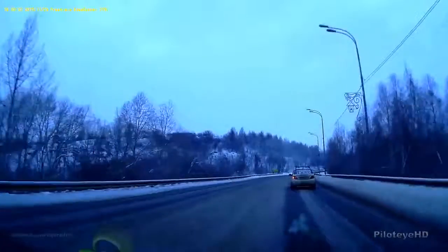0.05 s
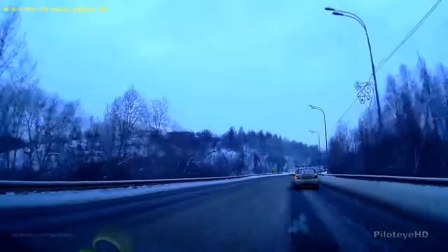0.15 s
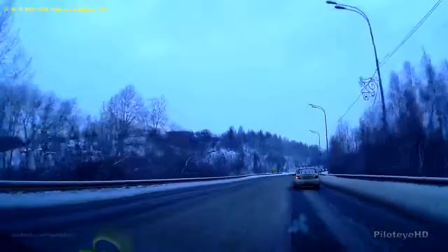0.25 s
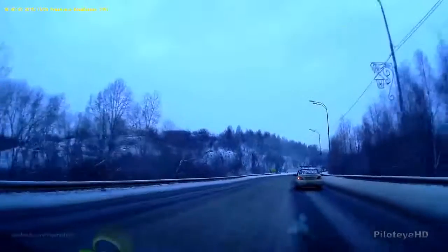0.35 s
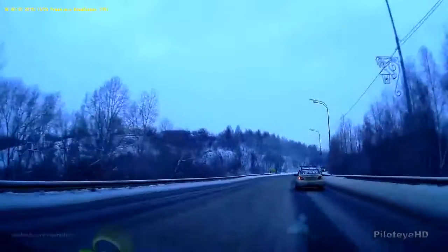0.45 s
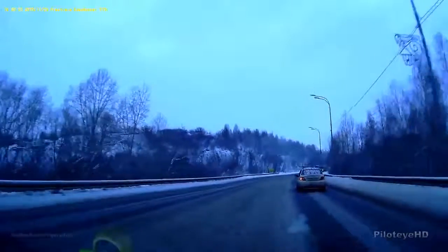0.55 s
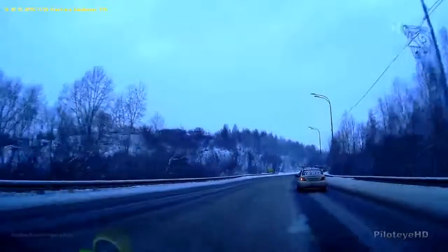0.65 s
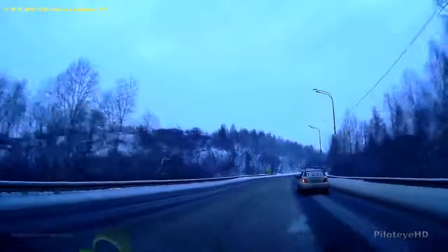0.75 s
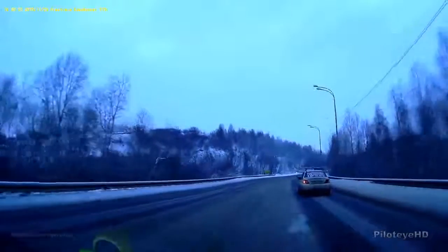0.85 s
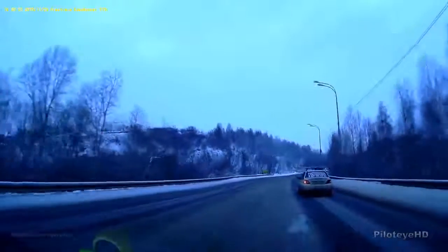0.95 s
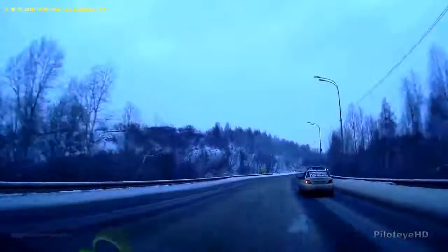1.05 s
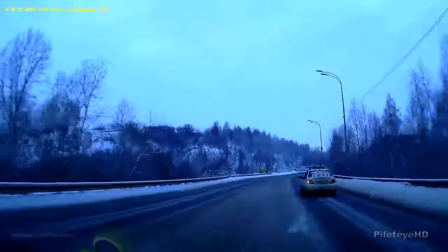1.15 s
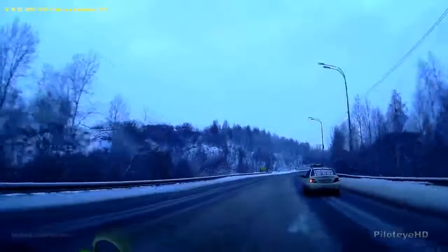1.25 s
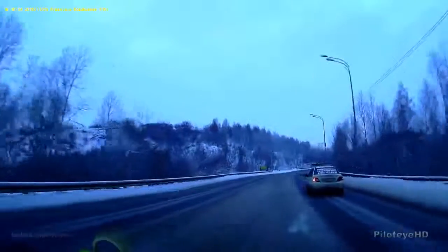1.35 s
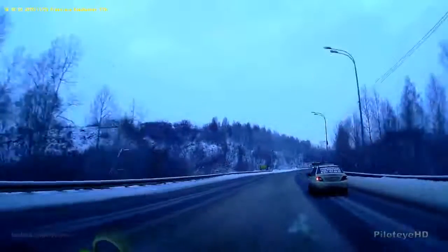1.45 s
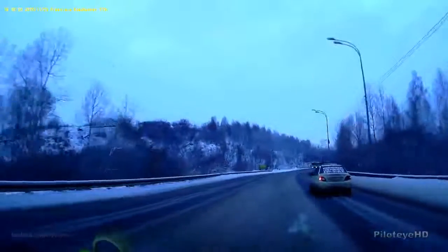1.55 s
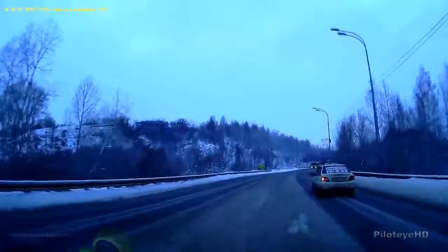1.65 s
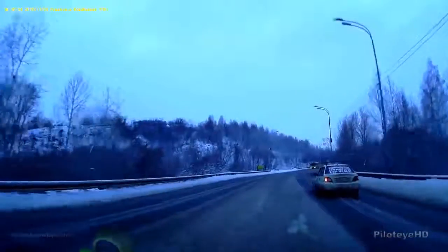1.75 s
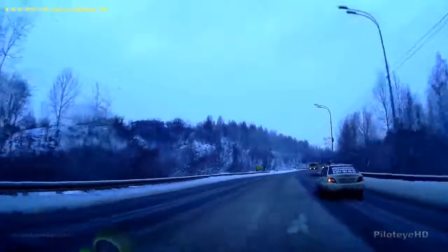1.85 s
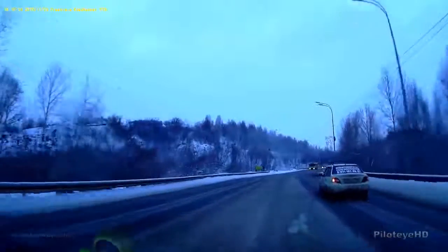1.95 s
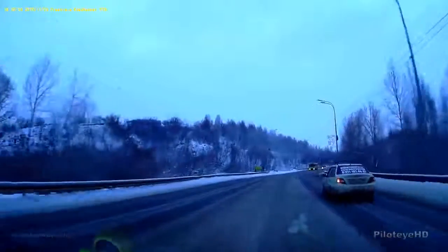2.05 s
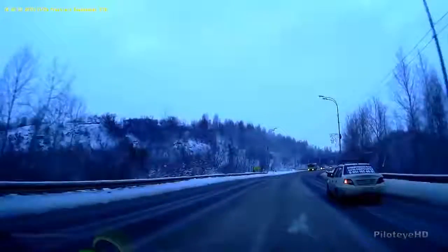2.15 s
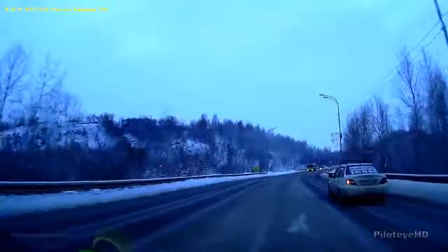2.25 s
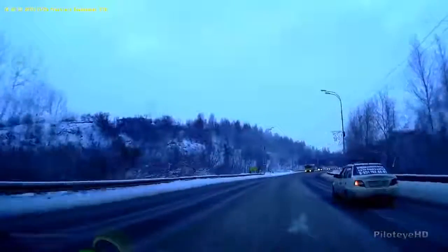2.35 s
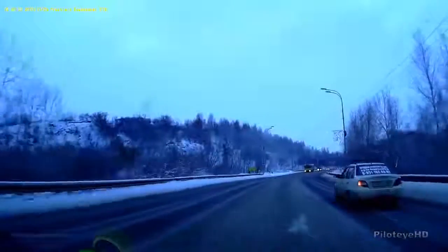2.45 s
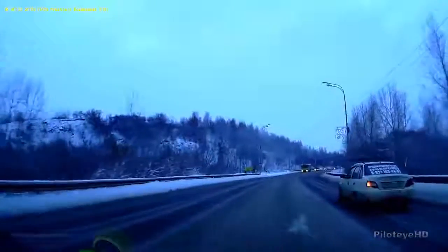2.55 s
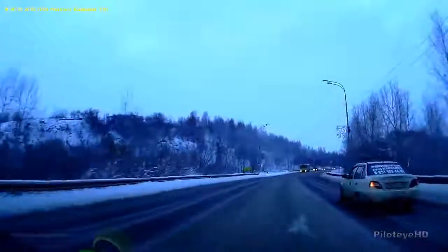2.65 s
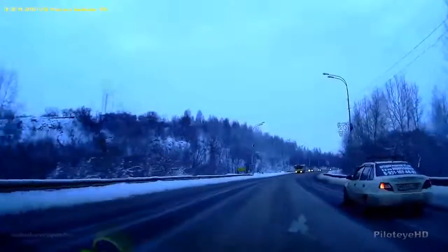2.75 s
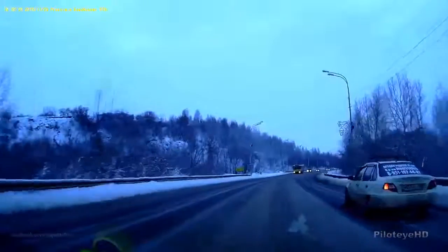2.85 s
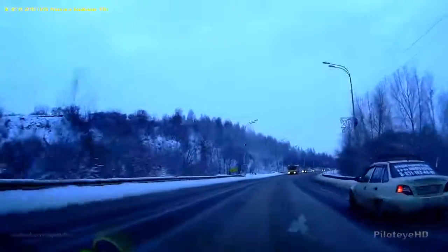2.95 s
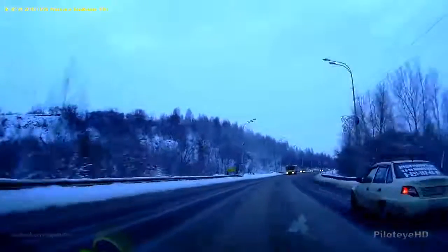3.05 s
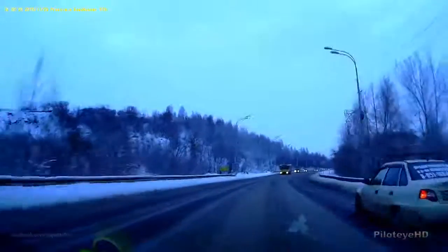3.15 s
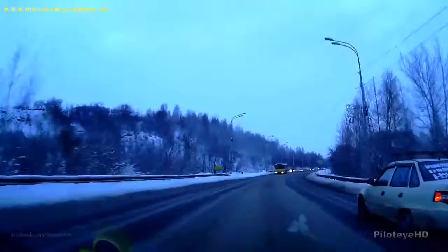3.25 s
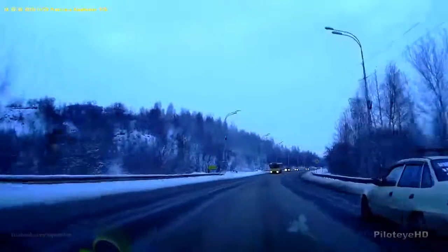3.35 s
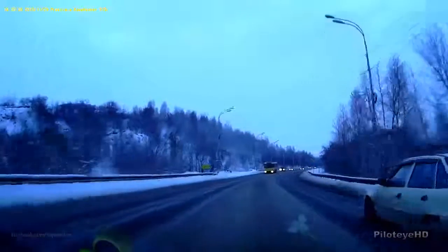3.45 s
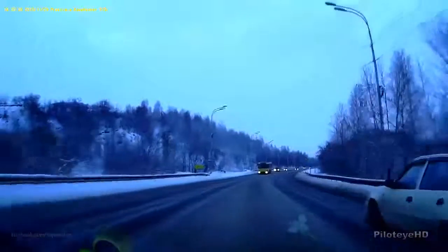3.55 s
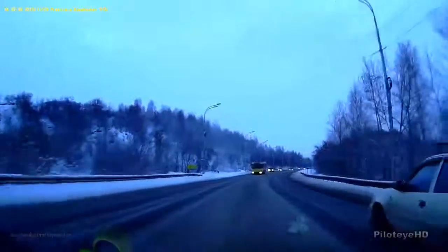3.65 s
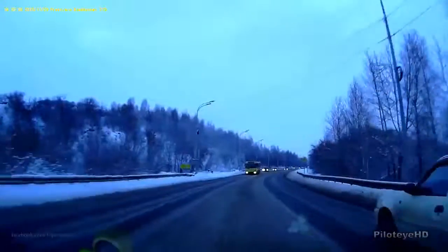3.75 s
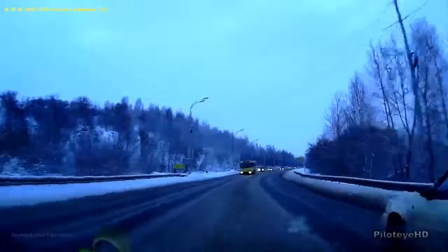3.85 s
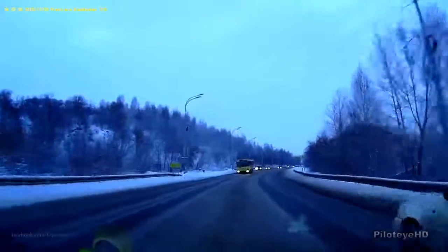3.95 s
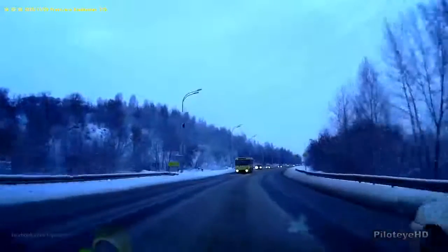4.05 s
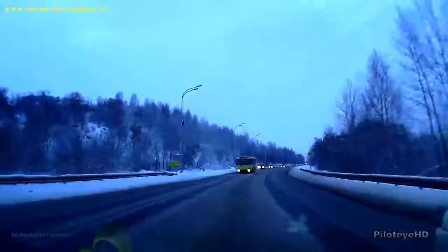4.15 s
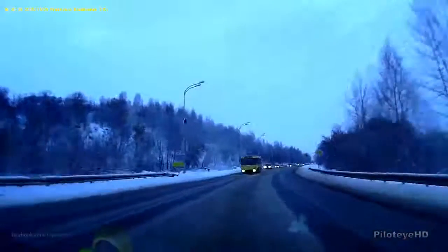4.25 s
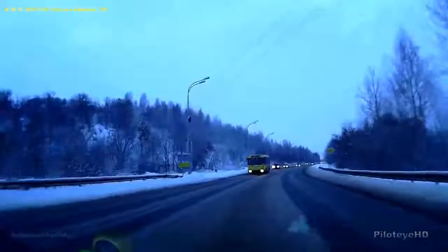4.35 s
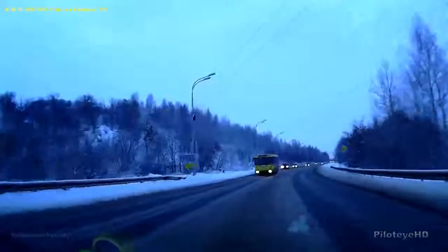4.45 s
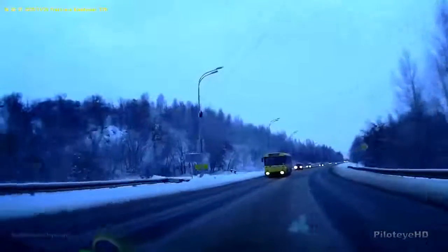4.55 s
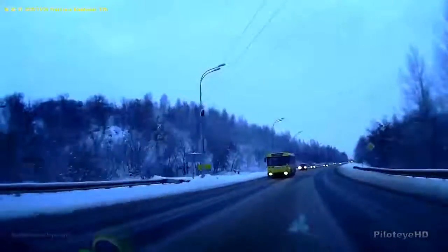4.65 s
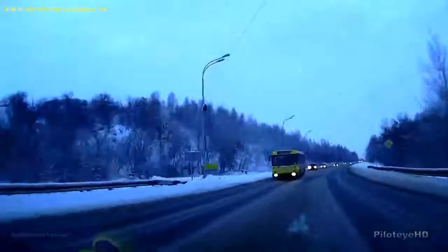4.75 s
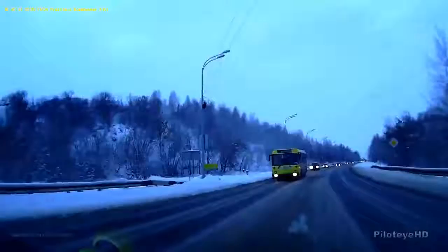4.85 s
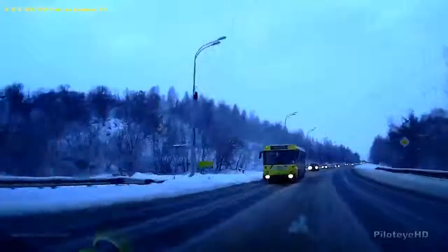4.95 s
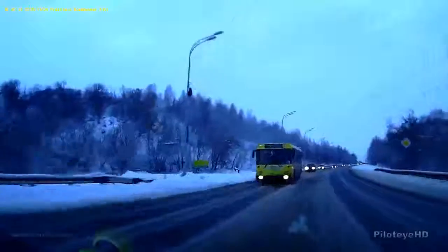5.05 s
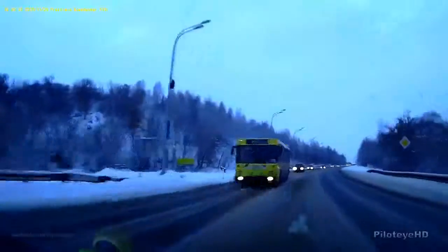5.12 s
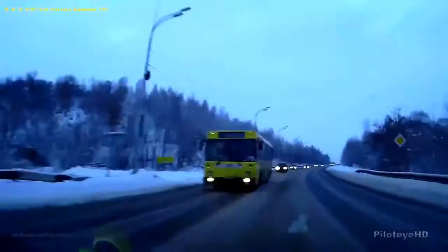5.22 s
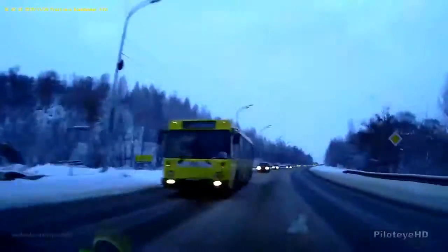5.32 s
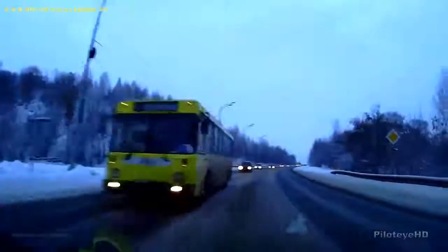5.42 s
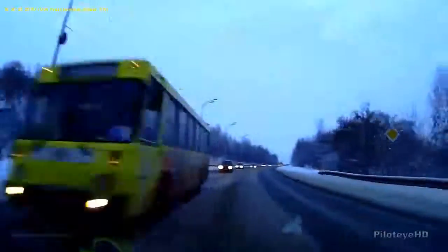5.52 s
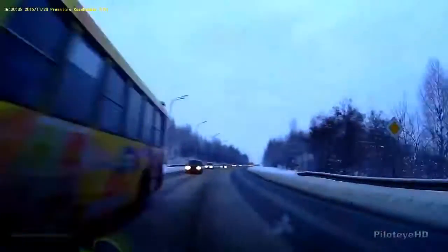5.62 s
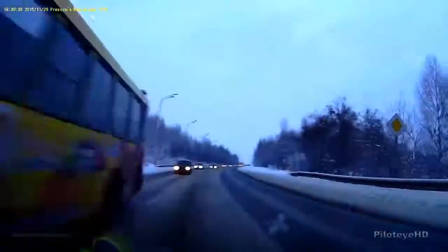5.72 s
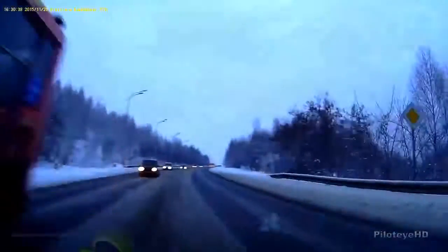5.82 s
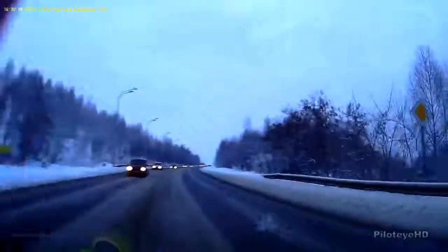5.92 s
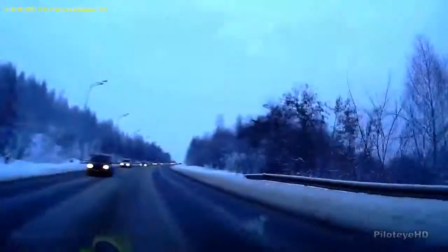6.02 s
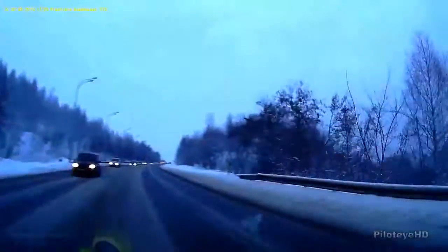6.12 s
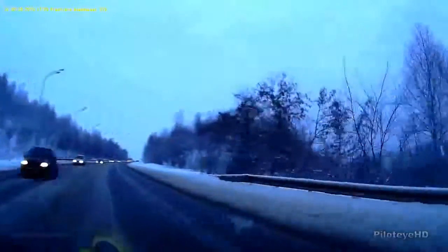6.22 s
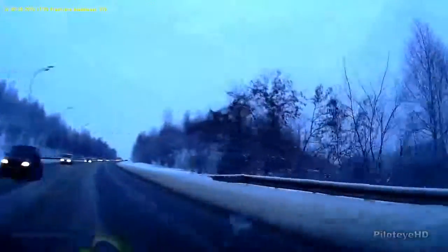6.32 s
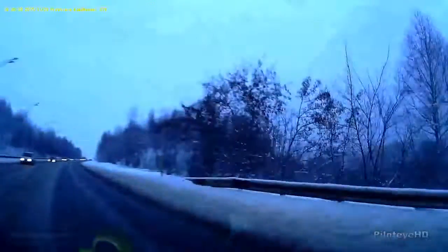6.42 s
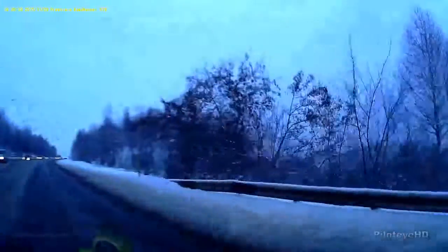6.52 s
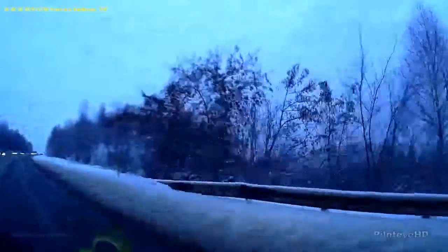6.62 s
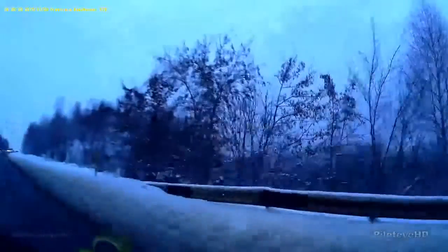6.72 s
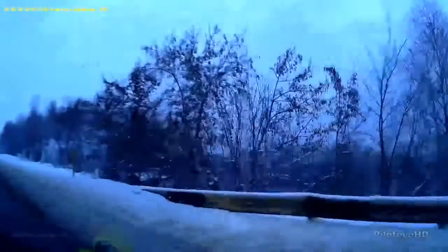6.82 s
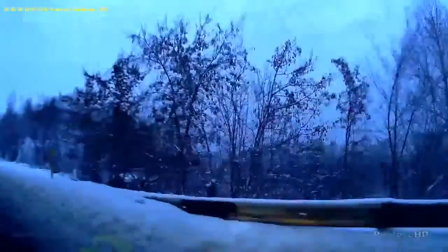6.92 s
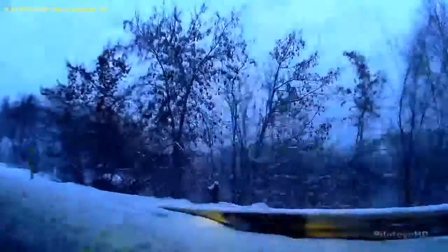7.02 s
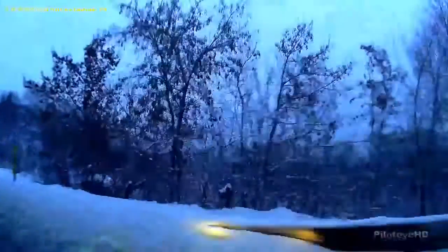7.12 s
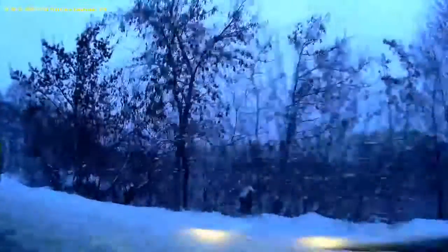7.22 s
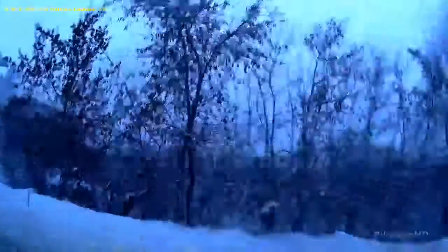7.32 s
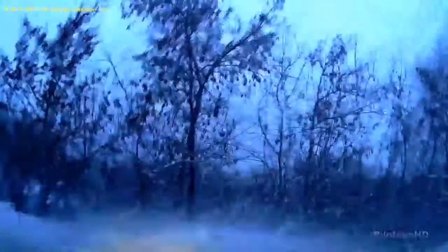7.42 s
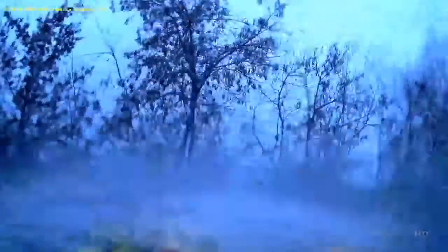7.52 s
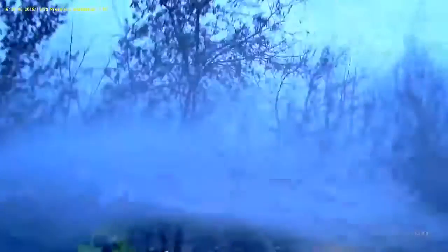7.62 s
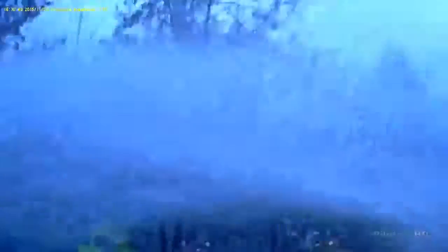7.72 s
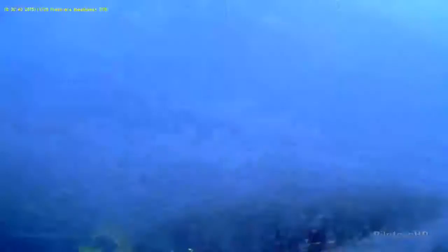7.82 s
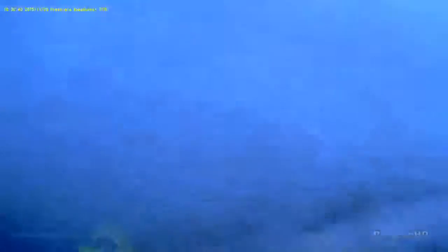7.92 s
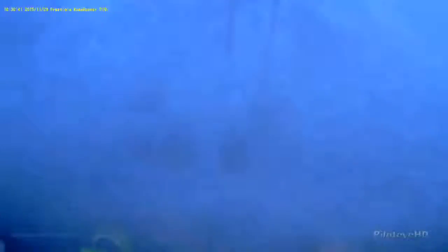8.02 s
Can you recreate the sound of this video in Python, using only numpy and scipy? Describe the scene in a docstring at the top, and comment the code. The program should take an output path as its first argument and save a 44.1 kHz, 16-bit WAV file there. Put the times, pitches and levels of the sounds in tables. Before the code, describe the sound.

A windscreen camera microphone picks up muffled engine drone, wheel rumble and faint electronic hiss in a small car. The engine revs briefly, then eases off. After four seconds, slush and thin spray build with loose plastic clatter. A deep falling boom begins the final crash, followed by rapid body blows, metallic panel ringing and dense lumps of snow, harshly distorted and loud to the end.

```python
"""The engine of a small car on a winter road, close up in the cabin, heard by a camera microphone on the windscreen.
Engine tones swell through cabin resonances as it revs and is let off, over filtered-noise boom and tyre roar.
Slush and spray, made of tiny random impacts, grow as the car skids; loose parts knock and ring around the cabin.
Then it ploughs into a snowbank and guard rail: thuds, ringing panels and flying snow.
This overloads the microphone, which rounds, sags and clips; noise bursts add its bright crackle."""
import sys
import numpy as np
from scipy import signal
from scipy.fft import rfft, irfft
from scipy.io import wavfile
from scipy.ndimage import uniform_filter1d

SR = 44100
rng = np.random.default_rng(int(sys.argv[2]) if len(sys.argv) > 2 else 0)


def wav_record(signal):
    """Record a signal, one row per channel, as 16-bit PCM in the file named by sys.argv[1]."""
    frames = np.transpose(np.atleast_2d(signal))
    bounded = np.clip(frames, -1, 1)
    # unit amplitude maps onto the largest positive 16-bit level
    quanta = np.round(bounded * 32767).astype(np.int16)
    wavfile.write(sys.argv[1], SR, quanta)


N = 356328
TIME = np.arange(N) / SR
FREQ = np.maximum(np.arange(N // 2 + 1) * SR / N, 1)
SKID_S, BANK_S = 4.32, 7.25  # the car leaves the ruts, then meets the bank [s]


def undb(db):
    """Decibels to gain."""
    return 10 ** (np.asarray(db) / 20)


def unit(x):
    """Scale to rms 1."""
    return x / np.sqrt(np.mean(x ** 2))


def curves(table):
    """The columns of a timed table at every sample."""
    s, *columns = np.transpose(table)
    return [np.interp(TIME, s, c) for c in columns]


def noise():
    """White noise."""
    return rng.standard_normal(N)


def walk(rate):
    """Smooth random wander of rms 1, with a new target `rate` times a second."""
    k = max(int(SR / rate), 1)
    steps = np.repeat(rng.standard_normal(N // k + 1), k)[:N]
    return unit(uniform_filter1d(steps, k))


def grains(rate, spread_db):
    """Random tiny impacts of uneven size, `rate` per second on average, rms 1."""
    size = undb(spread_db * np.minimum(rng.exponential(size=N), 4))
    return unit((rng.random(N) < rate / SR) * size * np.sign(noise()))


def colour(x, points):
    """Causal filter through (Hz, dB) points, falling away above the last; white noise keeps its level."""
    hz, db = np.transpose(points)
    gain = undb(np.interp(np.log(FREQ), np.log(hz), db)) / np.maximum(FREQ / hz[-1], 1) ** 4
    # folding the cepstrum gives minimum phase: no sound before its cause
    cepstrum = irfft(np.log(unit(gain) + 1e-6), N)
    cepstrum[1:N // 2] *= 2
    cepstrum[N // 2:] = 0
    fade = np.hanning(SR // 2)[-(SR // 4):]
    response = irfft(np.exp(rfft(cepstrum)), N)[:SR // 4] * fade
    return signal.fftconvolve(x, response)[:N]


def ring(x, modes):
    """Damped resonances (Hz, width Hz, dB); white noise keeps its level."""
    t = TIME[:SR // 10]
    response = 0
    for k, (hz, width, db) in enumerate(modes):
        decay = np.exp(-np.pi * width * t)
        response = response + undb(db) * width * decay * np.sin(2 * np.pi * hz * t) * (-1) ** k
    return signal.fftconvolve(x, response / np.linalg.norm(response))[:len(x)]


def even_swell(x, share):
    """Even out part of the chance swell of a low rumble."""
    power = uniform_filter1d(uniform_filter1d(x ** 2, size=800), size=600)
    return unit(x / (power + 0.015) ** (np.clip(share, 0, .9) / 2))


def strikes(times, levels_db, t60, rise):
    """Amplitude envelope of blows that rise quickly and die away; overlaps add in power."""
    power = np.zeros(N)
    for s, db in np.broadcast(times, levels_db):
        start = int(s * SR)
        t = TIME[:min(N - start, SR // 2)]
        power[start:start + len(t)] += (undb(db - 60 * t / t60) * (1 - np.exp(-t / rise))) ** 2
    return np.sqrt(power)


def swell(start, attack, hold, t60, db):
    """Amplitude envelope that rises, holds and fades."""
    t = TIME - start
    return np.clip(t / attack, 0, 1) * undb(db - 60 * np.maximum(t - attack - hold, 0) / t60)


def hump(s, width, db):
    """Amplitude envelope that swells and sinks smoothly around a moment."""
    return undb(db) * np.exp(-((TIME - s) / width) ** 2)


def skid(db, db_per_s):
    """Amplitude envelope that grows through the skid and dies in the bank."""
    growth = undb(db_per_s * np.clip(TIME - SKID_S, 0, BANK_S - SKID_S))
    return swell(SKID_S, .05, BANK_S - SKID_S, .3, db) * growth


# four-cylinder engine: (time [s], firing rate [Hz], level [dB])
ENGINE_RUN = [(0, 131.9, -33.5), (.6, 134.2, -34.5), (1.0, 139.1, -36.5), (1.22, 145.3, -33.5),
              (1.5, 149.8, -34), (1.75, 151.3, -36), (1.95, 155.3, -33.5), (2.15, 153.9, -34),
              (2.3, 147.8, -35), (2.5, 143.1, -35.5), (2.9, 139, -41), (4.5, 135.5, -38.5),
              (7.2, 119.1, -61.5)]
# engine tones: (multiple of the four-stroke cycle, where 4 is the firing rate, relative level [dB])
ENGINE_ORDERS = [(4, -5.5), (6, -19), (8, -7), (9, -17.5), (10, -14.5), (11, -13), (12, -9.5), (13, -19.5),
                 (14, -16), (15, -13.5), (16, -15.5), (17, -19), (24, -18.5)]
# cabin air resonances that lift the engine tones: (centre [Hz], width [Hz], lift [dB])
CABIN_RESONANCES = [(154.4, 12.2, 17), (439, 19, 3), (564, 10, 6)]
# what the valve clatter rings with: (pitch [Hz], width [Hz], relative level [dB])
BLOCK_MODES = [(550, 91, -1.5), (860, 240, 1), (1117, 170, -2), (1400, 72, -6.5), (1760, 140, -14.5),
               (2150, 160, -21.5), (3420, 140, -31.5)]
# thin engine whine: (pitch [Hz], width [Hz], relative level [dB])
PULL_MODE = [(3180, 75, 0)]
PULL_S, PULL_WIDTH_S, PULL_DB = 1.55, .7, -72  # middle [s], half length [s] and level [dB] of that whine


def engine():
    """Uneven engine orders swell at cabin resonances; valves clatter at each firing; a thin whine comes and goes."""
    hz, db = curves(ENGINE_RUN)
    cycle = np.cumsum(hz * (1 + .0035 * walk(30))) / SR / 4
    tones = 0
    for order, order_db in ENGINE_ORDERS:
        lift_db = 0
        for centre, width, peak_db in CABIN_RESONANCES:
            lift_db = lift_db + peak_db / (1 + ((order * hz / 4 - centre) / width) ** 2)
        waver_db = np.minimum(0.32 * order * walk(12), 5)  # the higher tones are less steady
        tone = np.sin(2 * np.pi * (order * cycle + rng.random()))
        tones = tones + undb(order_db + lift_db + waver_db) * tone
    firing = (1 + np.cos(8 * np.pi * cycle)) ** 2
    clatter = ring(noise() * unit(firing), BLOCK_MODES)
    whine = hump(PULL_S, PULL_WIDTH_S, PULL_DB) * ring(noise(), PULL_MODE)
    return undb(db) * (np.sqrt(2) * tones + undb(-12) * clatter) + whine


# tyres on the changing surface: (time [s], wheel drone [dB], roar [dB], tread hiss [dB])
TYRE_LEVELS = [(0, -30.5, -31, -51.5), (.7, -29, -33, -50), (2, -26, -31.5, -46.5), (2.4, -27, -34, -49),
               (2.7, -24, -28.5, -50.5), (3.6, -25, -33, -51), (4.6, -26.5, -32, -52.5),
               (5.4, -25, -33, -50.5), (6.1, -29.5, -31.5, -46.5), (7.2, -29, -32, -48)]
# bumps in the road that heave the body: (time [s], boom level [dB])
ROAD_BUMPS = [(.83, -16.5), (1.0, -18), (1.25, -21.5), (1.451, -19), (1.92, -15.5), (2.53, -14.5),
              (4.0, -12), (4.87, -19.5), (5.47, -15), (5.97, -13), (6.272, -13.5), (6.39, -17),
              (6.871, -14.5)]
# tone of the body boom, also heard in the bank: (frequency [Hz], relative level [dB])
BODY_BOOM_COLOUR = [(15, -12), (25, -8.5), (35, 1), (48, -5.5), (60, -10.5), (80, -19.5), (150, -34.5)]
# tone of the wheel drone: (frequency [Hz], relative level [dB])
WHEEL_DRONE_COLOUR = [(50, -16), (70, 4), (84, -7.5), (102, -1.5), (125, -9.5), (160, -9), (200, -13.5),
                      (240, -25)]
# tone of the tyre roar through the floor: (frequency [Hz], relative level [dB])
TYRE_ROAR_COLOUR = [(100, -13.5), (175, -0.5), (235, -4), (290, 1.5), (335, -1), (410, 2), (490, -2.5),
                    (570, -3.5), (690, -10), (870, -12), (1100, -26), (1400, -38.5)]
# tone of grit under the tread: (frequency [Hz], relative level [dB])
TREAD_HISS_COLOUR = [(500, -11), (860, 12.5), (1100, 6), (1400, 1), (1600, -4), (2050, -2.5), (2800, -13.5),
                     (3250, -11), (4000, -20.5), (4800, -31), (5600, -31), (6300, -29.5), (9000, -36)]
BUMP_WIDTH_S, BUMP_DRONE_DB = 0.045, -12  # half length of a bump [s]; its drone relative to its boom [dB]
BOOM_DB, BOOM_DB_PER_S = -21, 1.5  # steady boom [dB] and its growth from the skid on [dB per s]


def road():
    """The cabin booms on its springs, wheels drone, tyres roar through the floor and grit hisses under the tread."""
    drone_db, roar_db, tread_db = curves(TYRE_LEVELS)
    bumps = sum(hump(s, BUMP_WIDTH_S, db) for s, db in ROAD_BUMPS)
    boom_db = BOOM_DB + BOOM_DB_PER_S * np.maximum(TIME - SKID_S, 0) + 1.5 * walk(10)
    boom = np.hypot(undb(boom_db), bumps) * even_swell(colour(noise(), BODY_BOOM_COLOUR), share=0.55)
    drone_level = np.hypot(undb(drone_db + 1.6 * walk(9)), undb(BUMP_DRONE_DB) * bumps)
    drone = drone_level * even_swell(colour(noise(), WHEEL_DRONE_COLOUR), share=0.095)
    roar_grains = colour(grains(rate=3000, spread_db=1.5), TYRE_ROAR_COLOUR)
    roar = undb(roar_db + 0.96 * walk(14)) * roar_grains
    tread_grains = colour(grains(rate=6500, spread_db=2.5), TREAD_HISS_COLOUR)
    tread = undb(tread_db + 0.65 * walk(30)) * tread_grains
    return boom + drone + roar + tread


# steady whine of the camera at the microphone: (pitch [Hz], peak level [dB])
CAMERA_WHINE = [(7160, -86), (14320, -87.5)]
# thin whistle above the road noise: (pitch [Hz], width [Hz], relative level [dB])
WHISTLE_MODE = [(5500, 190, 0)]
HISS_DB, WHISTLE_DB = -74, -82


def electronics():
    """Faint white hiss and steady whine of the camera, with a thin, breathy whistle of ringing noise."""
    whine = sum(undb(db) * np.sin(2 * np.pi * hz * TIME) for hz, db in CAMERA_WHINE)
    whistle = undb(WHISTLE_DB) * ring(noise(), WHISTLE_MODE)
    return undb(HISS_DB) * noise() + whine + whistle


# loose things in the cabin: (time [s], level [dB], brightness [dB], t60 [s], strongest ring [Hz])
CABIN_RATTLES = [(.191, -37, -9, 0.017, 799), (0.431, -34, -19, 0.032, 900), (.434, -55, 14, .02, 6500),
                 (0.895, -38.5, -3, 0.032, 3300), (1.955, -43, 4.5, 0.046, 6500),
                 (2.017, -32.5, -18, 0.057, 846), (2.98, -38, -12, .025, 1440),
                 (4.411, -50, 12, .012, 7000), (4.850, -32.5, 12.5, 0.047, 2520),
                 (4.857, -40, 5.5, 0.049, 2700), (5.303, -31, -13, 0.036, 850),
                 (5.317, -24.5, -2, 0.03, 2050), (5.331, -29, -3, .03, 850), (5.346, -26.5, -2, .022, 840),
                 (5.360, -29.5, -15, 0.031, 2050), (5.384, -43, -11, 0.018, 2000),
                 (5.54, -36.5, -1, 0.054, 2300), (5.771, -35, -12, 0.038, 2000),
                 (5.782, -36, -19, 0.025, 2000), (5.849, -28.5, -1.5, 0.066, 3150),
                 (5.95, -30, -8, 0.051, 3400), (6.013, -23.5, -11, 0.02, 2100),
                 (6.036, -32, -7, 0.049, 2100), (6.165, -48, 11, .06, 7000), (6.217, -46.5, 23, .05, 6600),
                 (6.4, -28, -6, 0.03, 3500), (6.449, -35.5, 4, 0.053, 2100), (6.53, -52, 14, .08, 6500),
                 (6.69, -37, -4, 0.049, 2100), (6.733, -35.5, -14, 0.035, 2100),
                 (6.873, -23.5, -7, 0.027, 1700), (6.905, -29.5, -11, .025, 2100),
                 (6.943, -32, -8, .025, 2100), (7.003, -30, 0, 0.06, 3500), (7.018, -34.5, 8, 0.064, 6500),
                 (7.079, -31.5, 1, 0.093, 2100), (7.123, -31, 11.5, 0.074, 3500),
                 (7.174, -24.5, -2, 0.067, 3300), (7.639, -29, 9, 0.041, 7000)]
# tone of the knocking plastic: (frequency [Hz], relative level [dB])
PLASTIC_COLOUR = [(300, -5.5), (850, 17.5), (1200, -11), (1450, 3), (1750, -5.5), (2100, -1.5),
                  (2700, -12.5), (3400, -10), (4200, -19), (4900, -29), (6000, -23.5), (8000, -27.5),
                  (15000, -59)]
RATTLE_RISE_S, RATTLE_RING_DB, RATTLE_Q = 0.00056, 0, 5  # contact time; strength and sharpness of own ring
# faint ticks: rate [per s], level on the road [dB], growth from the skid on [dB per s], scatter [dB]
TICKS_PER_S, TICK_DB, TICK_DB_PER_S, TICK_SPREAD_DB = 13, -45.5, 2.5, 1


def rattles():
    """Loose plastic knocks, each contact with its own brightness and ring; faint random ticks grow from the skid on."""
    chatter = colour(noise(), PLASTIC_COLOUR)
    dull = signal.sosfiltfilt(signal.butter(2, 2600, fs=SR, output="sos"), chatter)
    ticks = rng.random(N) < TICKS_PER_S / SR
    tick_db = TICK_DB + TICK_DB_PER_S * np.maximum(TIME - SKID_S, 0) + TICK_SPREAD_DB * noise()
    out = chatter * strikes(TIME[ticks], tick_db[ticks], t60=0.037, rise=.0005)
    t = TIME[:SR // 8]
    for s, db, bright_db, t60, ring_hz in CABIN_RATTLES:
        span = slice(int(s * SR), int(s * SR) + len(t))
        bright = chatter[span] - dull[span]
        contact = undb(-0.19 * bright_db) * dull[span] + undb(bright_db) * bright
        knock = contact * undb(db - 60 * t / t60) * (1 - np.exp(-t / RATTLE_RISE_S))
        own_ring = signal.lfilter(*signal.iirpeak(ring_hz, RATTLE_Q, fs=SR), knock)
        out[span] += knock + undb(RATTLE_RING_DB) * own_ring
    return out


# wet patches of road before the skid: (time [s], half length [s], level [dB])
ROAD_WET_PATCHES = [(.32, .05, -76), (2.833, 0.099, -74), (3.947, .05, -73), (4.12, 0.069, -74)]
# tone of tyres on a wet patch: (frequency [Hz], relative level [dB])
WET_TYRE_COLOUR = [(3000, -14), (4200, 1.5), (4900, -14), (5600, 1.5), (7200, -5.5), (14000, -19.5)]


def wet_road():
    """Short, faint swishes of filtered noise as the tyres cross wet patches."""
    return sum(hump(*patch) for patch in ROAD_WET_PATCHES) * colour(noise(), WET_TYRE_COLOUR)


# deeper patches of slush, for slush and spray: (time [s], half length [s], slush level [dB], spray level [dB])
SLUSH_PATCHES = [(4.909, .04, -55, -65), (5.17, .06, -56, -71), (5.49, .09, -51, -66),
                 (6.005, 0.08, -40.5, -64), (6.202, 0.052, -54, -62), (6.335, 0.045, -43.5, -60),
                 (6.54, 0.051, -56, -66), (7.006, 0.27, -45, -74)]
# tone of wet clumps in the wheel arches: (frequency [Hz], relative level [dB])
CLUMP_COLOUR = [(400, -6), (900, 24.5), (1400, 7.5), (2100, 6), (2800, -5.5), (3400, -10.5), (4200, -21),
                (4900, -29.5), (5700, -24.5), (7000, -23), (9000, -32.5), (15000, -36)]
SLUSH_DB, SLUSH_DB_PER_S = -63.5, 8.5  # level as the skid starts [dB] and growth [dB per s]


def slush():
    """Wet clumps, as random grains, spatter the wheel arches as the car slides out of the ruts."""
    patches = sum(hump(s, width, db) for s, width, db, _ in SLUSH_PATCHES)
    flow = np.hypot(skid(SLUSH_DB, SLUSH_DB_PER_S), patches)
    return flow * undb(2.1 * walk(45)) * colour(grains(rate=800, spread_db=2.0), CLUMP_COLOUR)


# tone of the droplets: (frequency [Hz], relative level [dB])
DROPLET_COLOUR = [(1500, -20), (3000, -1), (3700, 3), (4300, 3), (4900, -20), (5700, -3.5), (7000, -6.5),
                  (9000, -13.5), (14000, -22)]
SPRAY_DB, SPRAY_DB_PER_S = -77, 1.5  # level as the skid starts [dB] and growth [dB per s]


def spray():
    """A thin hiss of droplets, as dense grains, through the skid and stronger in the deeper slush."""
    patches = sum(hump(s, width, db) for s, width, _, db in SLUSH_PATCHES)
    flow = np.hypot(skid(SPRAY_DB, SPRAY_DB_PER_S), patches)
    return flow * undb(1.5 * walk(35)) * colour(grains(rate=2500, spread_db=2.5), DROPLET_COLOUR)


# snowbank and rail against the body, all around the microphone:
# (time [s], panel drive [dB], crunch t60 [s], thud [dB], lurch drive [dB], favoured ring [Hz])
BODY_BLOWS = [(7.116, -2, 0.043, -26, -19, 454), (7.188, -19, 0.094, -13, -21, 796),
              (7.255, -0.5, 0.036, -9, -8, 920), (7.268, 0, 0.057, 1.5, -14, 350),
              (7.28, -6.5, 0.037, -13, -4.5, 900), (7.303, -16, 0.026, -16, -29, 714),
              (7.317, -5, 0.037, -2.5, -19, 714), (7.349, 1.5, 0.026, -7, -26, 686),
              (7.365, -7, 0.014, -16, -26, 796), (7.38, -3.5, 0.029, -5.5, -28, 890),
              (7.405, -2.5, 0.044, -4.5, -16, 895), (7.434, -5, 0.024, -3.5, -1, 570),
              (7.446, 2.5, 0.027, -13, -30, 600), (7.463, -6, 0.035, -9, -5, 590),
              (7.471, 0, 0.035, -12, -24, 716), (7.49, -3, 0.04, -13, -12, 900),
              (7.501, -10, 0.067, -22, -30, 1150), (7.521, -11, 0.059, -15, -12, 850),
              (7.555, -2, 0.049, -8, -6.5, 855), (7.738, -4, 0.072, -25.5, -22, 2000),
              (7.755, -1, 0.055, .5, 0, 450), (7.786, -9, .055, -7, -22, 330),
              (7.809, -4, .045, -8, 0.5, 550), (7.82, 1, 0.023, -18, -19, 800),
              (7.843, -5.5, 0.079, -11, -8.5, 447), (7.869, 3, 0.05, -11, -8, 352),
              (7.902, 0, 0.058, -4.5, -11, 455), (7.934, 5.5, 0.077, -2.5, 1.5, 454),
              (7.966, -2, 0.042, -14, -12, 600), (7.977, 0.5, 0.047, -1, -15, 250),
              (8.001, -6.5, 0.086, -3.5, -31, 247), (8.023, -7, 0.052, -13, -16, 450),
              (8.056, -2, 0.039, -15, -8, 720)]
# what the body rings with: (pitch [Hz], width [Hz], relative level before a blow favours some [dB])
PANEL_MODES = [(258, 107, -1), (349.5, 35, -1), (421, 79, -1), (575, 81, -2.5), (697, 100, -13.5),
               (849, 92, -3), (907, 250, -9.5), (1126, 156, -16), (1370, 190, -27), (2170, 160, -25),
               (3460, 300, -42)]
# tone of the thuds: (frequency [Hz], relative level [dB])
BODY_THUD_COLOUR = [(30, -17.5), (70, 4.5), (120, -2), (180, -4.5), (300, -15), (500, -25.5)]
THUD_T60_S = 0.12
LURCH_HZ, LURCH_S = 33.1, 0.016  # swing of the cabin air after a blow [Hz], and the time it takes to build [s]


def blows():
    """Each blow is a thud, a lurch of the cabin air and a crunch that rings the panels nearest to where it lands."""
    s, _, _, thud_db, _, _ = np.transpose(BODY_BLOWS)
    rumble = even_swell(colour(noise(), BODY_THUD_COLOUR), share=0.65)
    out = rumble * strikes(s, thud_db, THUD_T60_S, rise=0.0022)
    crunch = grains(rate=4000, spread_db=1.0)
    for s, db, t60, _, lurch_db, ring_hz in BODY_BLOWS:
        start = int(s * SR)
        t = TIME[:min(N - start, SR // 3)]
        span = slice(start, start + len(t))
        push = undb(db - 60 * t / t60) * (1 - np.exp(-t / .002))
        modes = []
        for hz, width, mode_db in PANEL_MODES:
            octaves = np.log2(hz / ring_hz)
            modes.append((hz, width, mode_db + 8 * np.exp(-(octaves / 0.45) ** 2)))
        build = 2 * t / LURCH_S * np.exp(-(t / LURCH_S) ** 2 / 2)
        lurch = undb(lurch_db) * np.sin(2 * np.pi * LURCH_HZ * t) * build
        out[span] += ring(crunch[span] * push, modes) + lurch
    return out


# snow over the bonnet, then separate slabs on the glass, close to the microphone:
# (start [s], attack [s], hold [s], fading t60 [s], level [dB], bright crackle relative to the rush [dB])
SNOW_SURGES = [(7.238, .012, .66, .18, -21.5, -32), (7.454, 0.011, .03, 0.45, -28, -26),
               (7.7, 0.016, 0.016, 0.045, -23, -27), (7.737, .002, 0.031, .027, -13.5, -14),
               (7.783, 0.0039, 0.042, 0.018, -13, -18), (7.84, 0.0035, 0.029, 0.19, -11.5, -21),
               (7.929, 0.011, 0.01, 0.025, -8, -22), (7.956, 0.0083, 0.059, 1, -18, -20)]
# the body heaving in the bank: (time [s], half length [s], level [dB])
BODY_HEAVES = [(7.3, 0.14, -14), (7.505, 0.14, -12), (7.696, 0.02, -10), (7.86, 0.11, -9)]
# tone of the rushing snow: (frequency [Hz], relative level [dB])
SNOW_RUSH_COLOUR = [(60, -3.5), (140, 7.5), (260, 1), (480, 4.5), (700, -0.5), (920, -4), (1300, -15.5),
                    (2100, -20), (3300, -26.5), (4200, -35), (4800, -42), (7500, -45), (15000, -74)]
# bright crackle of the overloaded microphone: (frequency [Hz], relative level [dB])
CRACKLE_COLOUR = [(600, 12), (1800, 12), (4000, -3.5), (5200, -11), (8000, -22), (15000, -28.5)]
CRACKLE_FLICKER_DB = 5  # how unevenly it crackles in the snow


def plough():
    """The body heaves in the bank; lumps of snow, as grains, pour over bonnet and glass with a bright crackle."""
    boom = even_swell(colour(noise(), BODY_BOOM_COLOUR), share=0.53)
    heave = sum(hump(*surge) for surge in BODY_HEAVES) * boom
    snow = undb(2.0 * walk(70)) * colour(grains(rate=3500, spread_db=3.5), SNOW_RUSH_COLOUR)
    flicker = undb(CRACKLE_FLICKER_DB * walk(110))
    crackle = flicker * colour(grains(rate=1100, spread_db=2.5), CRACKLE_COLOUR)
    rush = sum(swell(*wave) * (snow + undb(crackle_db) * crackle) for *wave, crackle_db in SNOW_SURGES)
    return heave + rush


# bright crackle of the overloaded microphone: (time [s], level [dB], t60 [s])
OVERLOAD_CRACKLES = [(7.27, -15, 0.014), (7.341, -23, .02), (7.382, -20, 0.023), (7.408, -19.5, 0.024),
                     (7.438, -13, 0.034), (7.474, -20, .02), (7.491, -19, .022), (7.558, -18.5, 0.035),
                     (7.737, -14.5, 0.069), (7.762, -10, .01), (7.773, -4, 0.012), (7.791, -16, .015),
                     (7.807, -15, .03), (7.816, -7.5, 0.017), (7.839, -12, .012), (7.852, -18, .025),
                     (7.894, -24, .015), (7.912, -13.5, 0.022), (7.943, -11, 0.022), (7.972, -16, 0.011),
                     (7.98, -13, 0.016), (8.023, -26, .02)]
# tone of the bright click: (frequency [Hz], relative level [dB])
CLICK_COLOUR = [(1000, 0), (3500, 0), (4800, -3), (7500, -8), (10000, -15), (15000, -21)]
BLOW_CRACKLE_DB, BLOW_CRACKLE_T60_S = -23, 0.018  # the crackle that goes with each blow in the bank
CLICK_S, CLICK_DB, CLICK_T60_S = 7.325, -11, .009


def overload_crackle():
    """Short bright noise bursts of the overloaded microphone, with and between the blows, and one short bright click."""
    in_bank = [blow[0] for blow in BODY_BLOWS if blow[0] > BANK_S]
    bursts = strikes(in_bank, BLOW_CRACKLE_DB, BLOW_CRACKLE_T60_S, rise=0.00058)
    for s, db, t60 in OVERLOAD_CRACKLES:
        bursts = bursts + strikes([s], db, t60, rise=0.00072)
    click = strikes([CLICK_S], CLICK_DB, CLICK_T60_S, rise=0.00033)
    return colour(noise() * bursts, CRACKLE_COLOUR) + colour(np.sign(noise()) * click, CLICK_COLOUR)


THUMP_S = 7.264  # the nose digs in [s]
THUMP_START_HZ, THUMP_END_HZ, THUMP_FALL_S = 329.2, 68.4, 0.062  # falling pitch and its time constant
THUMP_DB, THUMP_HOLD_S, THUMP_T60_S, THUMP_JUDDER_PER_S = -10.5, 0.13, 0.16, 180


def thump():
    """The nose digs into the bank: a heavy, rough boom that sinks in pitch as the snow packs."""
    age = np.maximum(TIME - THUMP_S, 0)
    hz = THUMP_END_HZ + (THUMP_START_HZ - THUMP_END_HZ) * np.exp(-age / THUMP_FALL_S)
    angle = 2 * np.pi * np.cumsum(hz) / SR
    # two independent wanders roughen both level and phase
    body = unit(walk(THUMP_JUDDER_PER_S) * np.sin(angle) + walk(THUMP_JUDDER_PER_S) * np.cos(angle))
    return even_swell(body, share=0.31) * swell(THUMP_S, 0.0073, THUMP_HOLD_S, THUMP_T60_S, THUMP_DB)


def scene():
    """Everything heard in the cabin, with the crackle of the microphone."""
    driving = engine() + road() + rattles() + wet_road() + slush() + spray()
    crash = blows() + plough() + overload_crackle() + thump()
    return (driving + crash + electronics())[None]


# microphone response to its own overload: (frequency [Hz], level, used relative to the first row [dB])
MIC_OVERLOAD_COLOUR = [(1000, 6), (4000, -7), (4800, -4.5), (7500, -6.5), (10000, -5.5), (15000, -5.5)]
TOP_HZ = 15800  # top of the microphone's band


def record(dry):
    """The microphone overloads with rounded, sagging tops that choke the other sounds; the highest peaks clip hard."""
    ceiling, knee, limit = .77, 4.2, .72
    # the soft overload is dull; the hard clipping is bright
    hz, db = np.transpose(MIC_OVERLOAD_COLOUR)
    response = undb(np.interp(FREQ, hz, db - db[0]))
    drive = irfft(rfft(dry) / response, N)
    rounded = drive / (1 + np.abs(drive / ceiling) ** knee) ** (1 / knee)
    sagging = signal.sosfilt(signal.butter(1, 3, "high", fs=SR, output="sos"), rounded)
    overloaded = irfft(rfft(sagging) * response, N)
    clipped = np.clip(overloaded, -limit, limit)
    return signal.sosfilt(signal.ellip(8, .2, 70, TOP_HZ, fs=SR, output="sos"), clipped)


dry = scene()
out = record(dry)
wav_record(out)
```